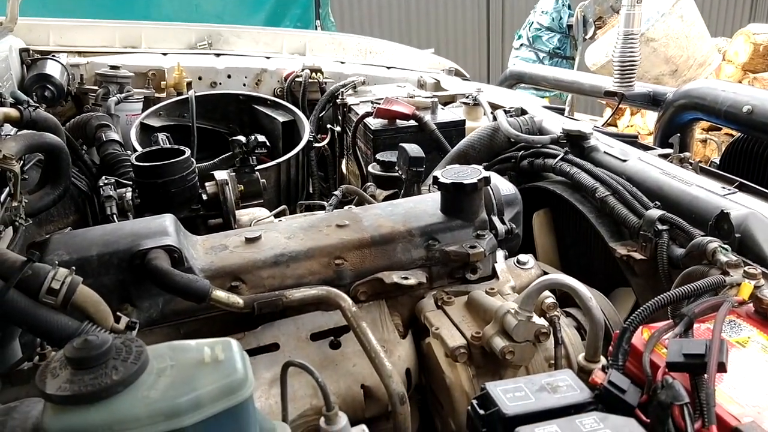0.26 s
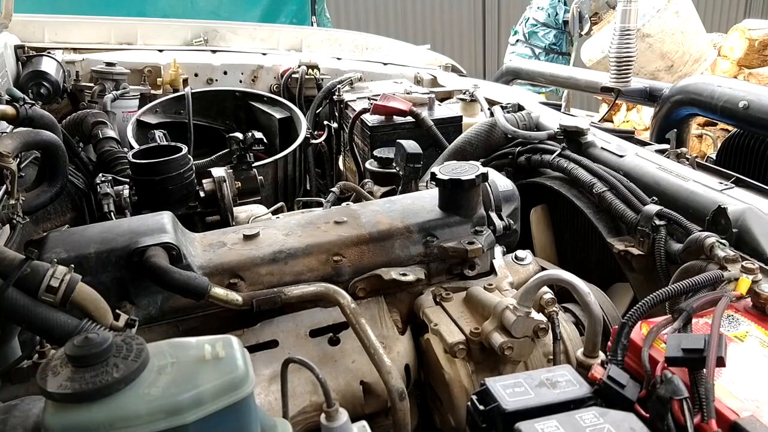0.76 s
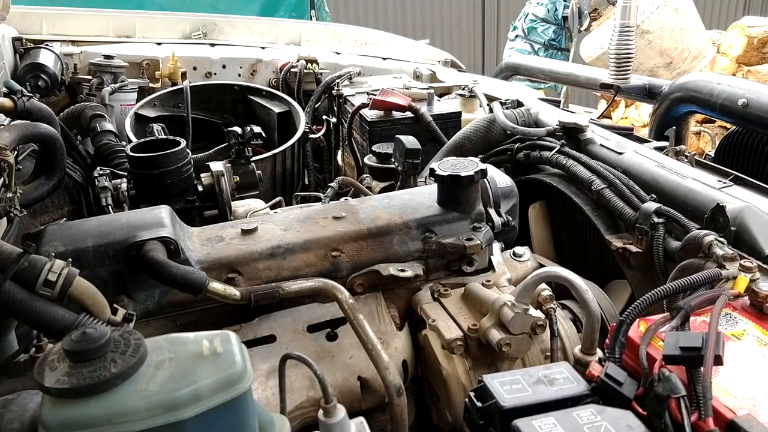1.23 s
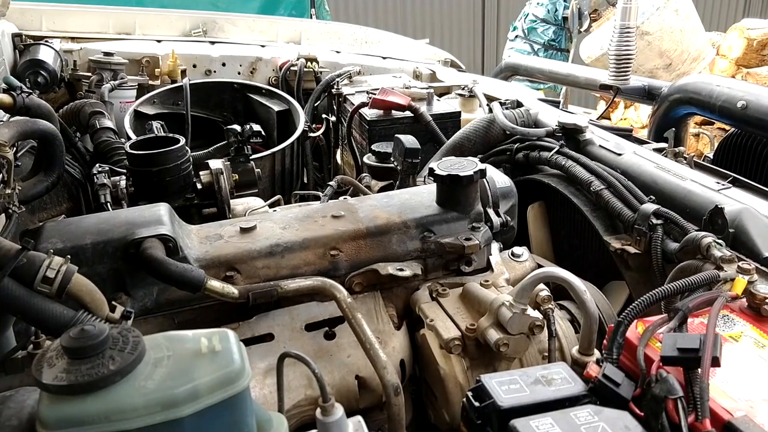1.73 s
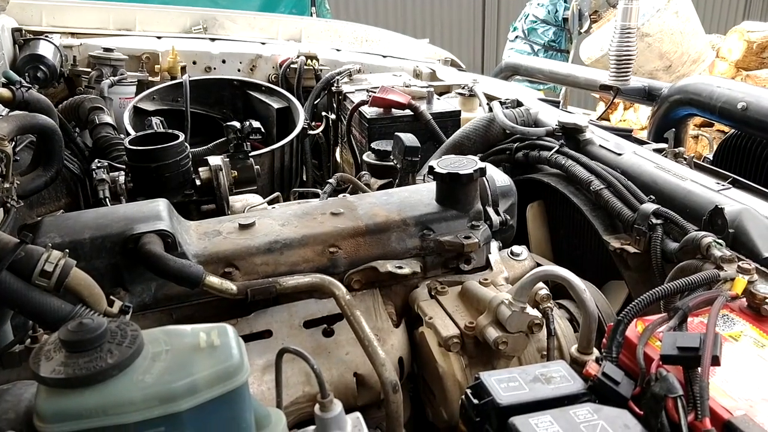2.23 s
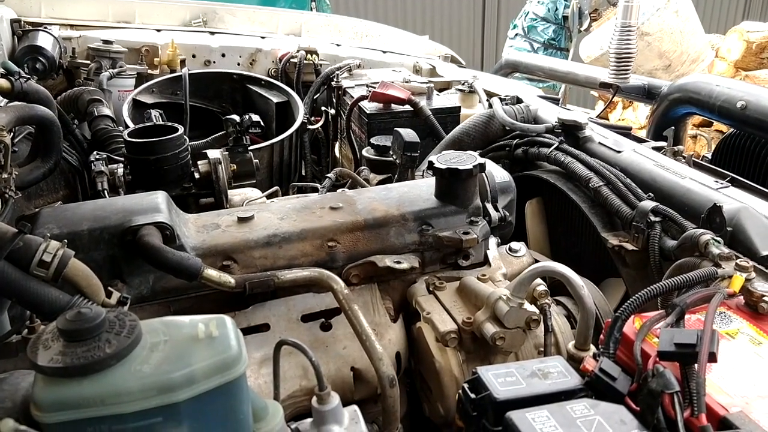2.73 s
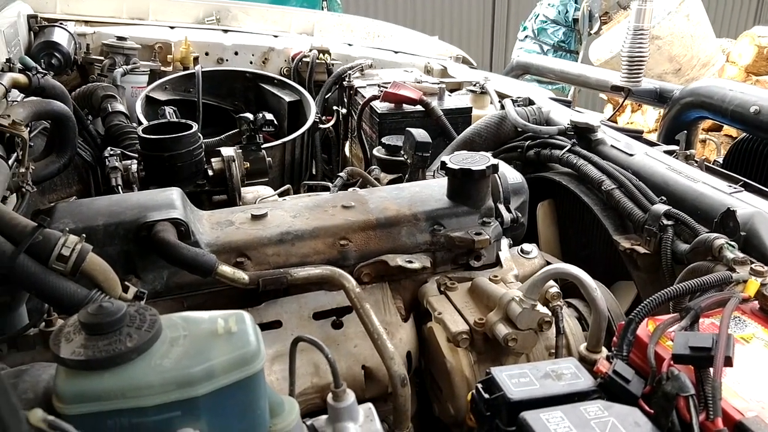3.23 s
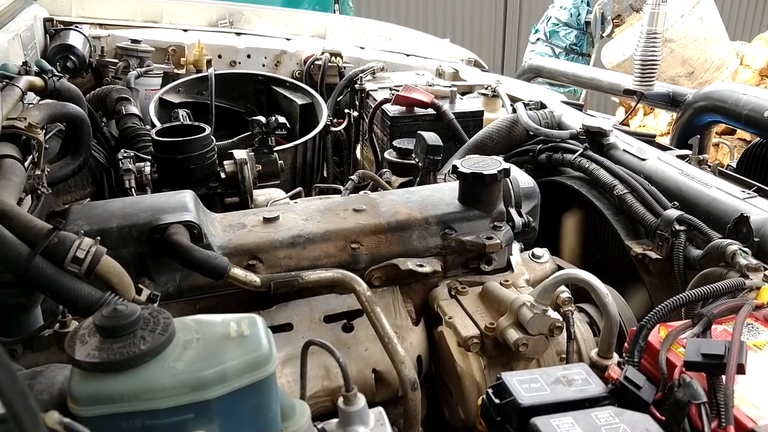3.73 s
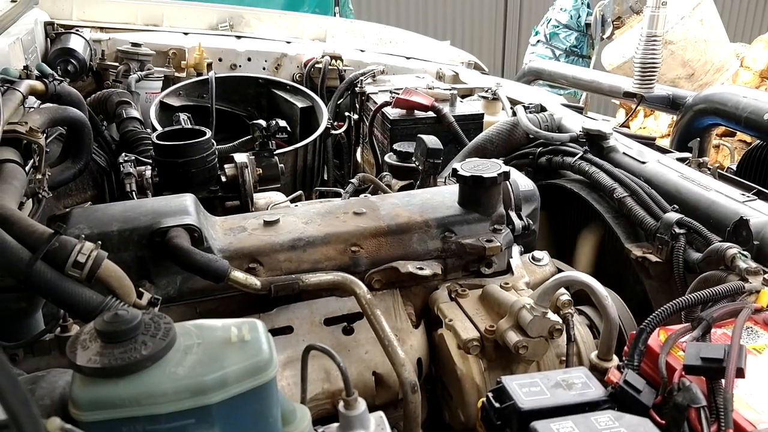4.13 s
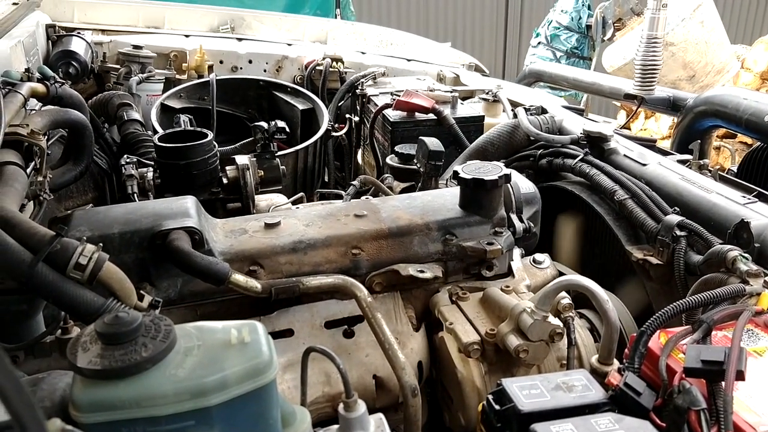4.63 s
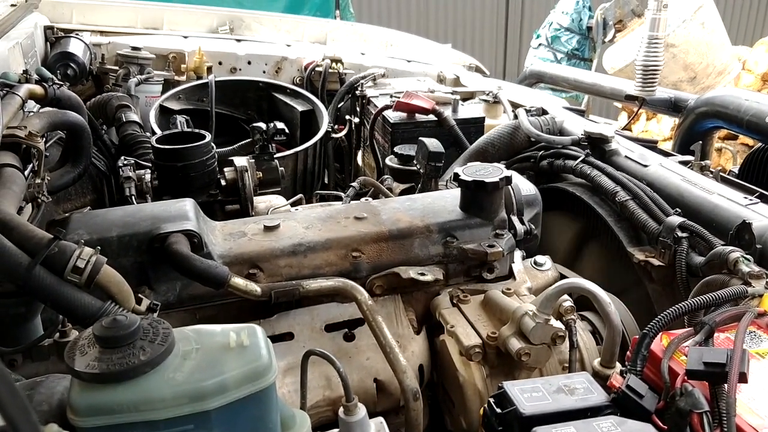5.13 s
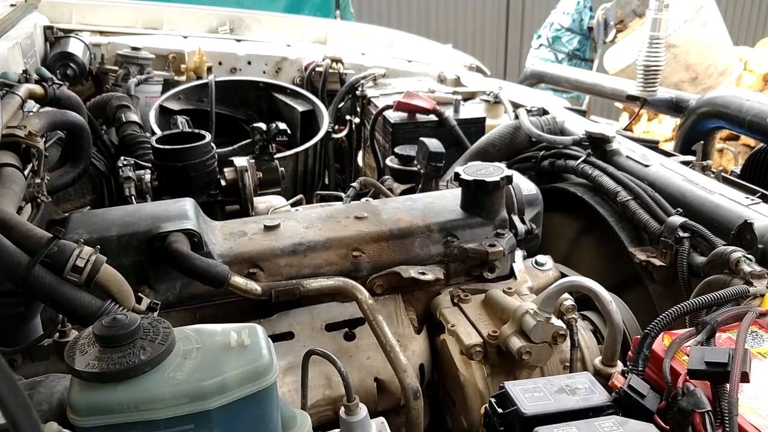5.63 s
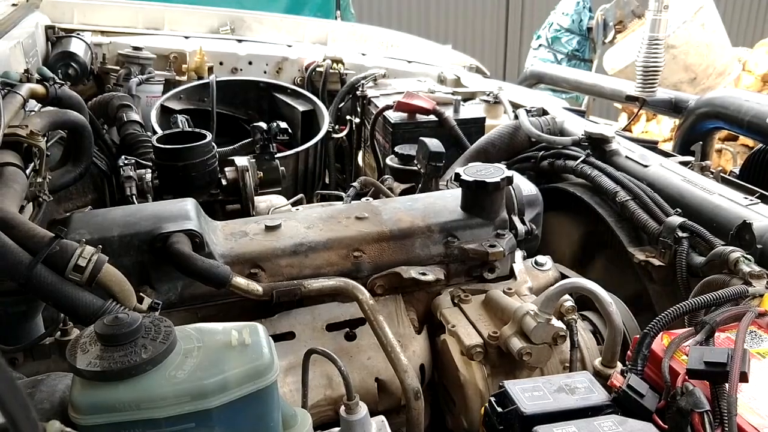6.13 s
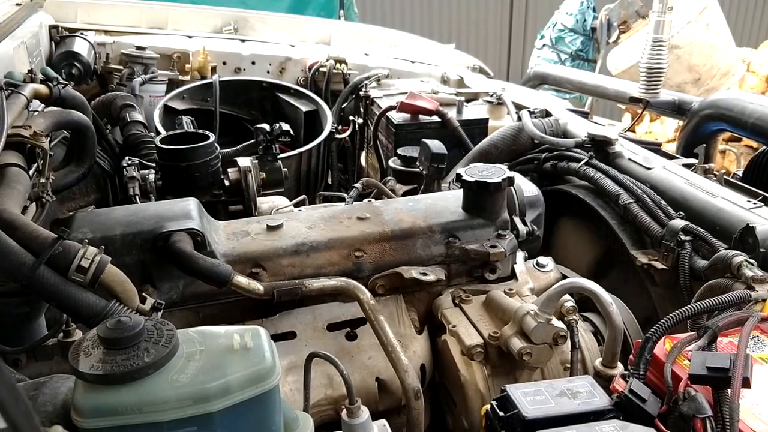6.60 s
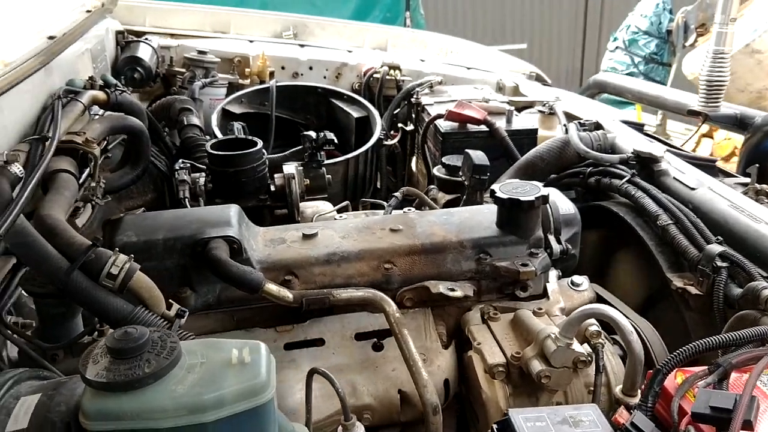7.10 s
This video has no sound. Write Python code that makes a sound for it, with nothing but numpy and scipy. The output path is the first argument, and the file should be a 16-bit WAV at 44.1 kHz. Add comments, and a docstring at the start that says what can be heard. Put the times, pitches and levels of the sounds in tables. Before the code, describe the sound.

Close to a diesel engine under an open bonnet, a few faint relay clicks and a brief pump buzz sound over a distant rumble. A low whirr rises quietly, with more sparse clicks. Halfway through, the starter engages with a metallic clack and cranks in grinding pulses for about a second. The engine catches and idles unevenly, thumping and knocking over the hiss of its fan.

```python
"""A four-cylinder diesel cranks, catches and idles with a hunting governor under an open bonnet.
Each firing thumps the intake, drums the block, knocks and ticks an injector; fan and belts hiss
and the timing gears whine. Before that, over a distant rumble and a low whirr, relays click, a small
pump buzzes and the starter's gears groan and grind against each compression.
Two microphone ports hear it from close by, with treble scattered by bonnet and walls."""
import sys
import numpy as np
from scipy import signal
from scipy.fft import rfft, irfft, next_fast_len
from scipy.io import wavfile
from scipy.ndimage import uniform_filter1d

SR = 44100
rng = np.random.default_rng(int(sys.argv[2]) if len(sys.argv) > 2 else 0)


def wav_out(sig):
    """Save sig, one row per channel (or a flat mono array), as 16-bit PCM at SR to the path in sys.argv[1]."""
    wavfile.write(sys.argv[1], SR, np.round(np.clip(np.atleast_2d(sig).T, -1, 1) * 32767).astype(np.int16))


N = 324576
TIME = np.arange(N) / SR
N_FFT = next_fast_len(N + 4096)
BIN_HZ = np.fft.rfftfreq(N_FFT, 1 / SR)


def gain(db):
    return 10 ** (np.asarray(db) / 20)


def unit_rms(x):
    return x / np.sqrt(np.mean(x ** 2) + 1e-20)


def noise():
    return rng.standard_normal(N)


def at_hz(points, hz):
    f, value = np.transpose(points)
    return np.interp(np.log(hz + 1), np.log(f + 1), value)


def envelope(points):
    return gain(np.interp(TIME, *np.transpose(points)))


def colour(x, points):
    """Zero-phase filter through (Hz, dB) points."""
    return irfft(rfft(x, N_FFT) * gain(at_hz(points, BIN_HZ)))[:N]


def ring(x, modes):
    """Parallel resonances, each (Hz, width in Hz, peak gain in dB)."""
    return sum(gain(db) * signal.lfilter(*signal.iirpeak(hz, hz / width, SR), x)
               for hz, width, db in modes)


def strikes(times_s, size):
    train = np.zeros(N + SR)
    np.add.at(train, np.round(np.asarray(times_s) * SR).astype(int), size)
    return train[:N]


def bursts(train, t60_s, rise_s=0.0018):
    """Decaying noise at each strike."""
    t = np.arange(SR // 4) / SR
    shape = gain(-60 * t / t60_s) * (1 - np.exp(-t / rise_s))
    return signal.oaconvolve(train, shape)[:N] * noise()


def swells(rows, rise_db_per_s, fall_db_per_s, rest_db):
    """Level in dB: each row rises to its start, drifts to its end and falls to rest."""
    level_db = np.full(N, float(rest_db))
    for s, length, start_db, end_db, *_ in rows:
        corners_s = [s - 1, s, s + length, s + length + 1]
        corners_db = [start_db - rise_db_per_s, start_db, end_db, end_db - fall_db_per_s]
        level_db = np.maximum(level_db, np.interp(TIME, corners_s, corners_db))
    return level_db


# Each row: frequency in Hz, gain in dB.
RUMBLE_SPECTRUM = [(70, -2.5), (130, 0.5), (250, -14), (450, -15), (750, -17), (1200, -27.5), (2000, -33),
                   (4500, -41), (13000, -47)]
# Each row: time in seconds, relative level in dB.
RUMBLE_LEVELS = [(0, -49), (2.9, -47), (3.7, -46)]
WHIRR_LEVELS = [(.95, -59.5), (1.2, -46.5), (3.7, -44)]


def background():
    """Lumpy distant rumble and a low whirr that swells."""
    lumps = gain(unit_rms(uniform_filter1d(noise(), 2500)))
    rumble = unit_rms(colour(noise(), RUMBLE_SPECTRUM))
    whirr = unit_rms(colour(noise(), [(170, 0), (320, 4.5), (390, -12.5), (800, -66)]))
    return envelope(RUMBLE_LEVELS) * lumps * rumble + envelope(WHIRR_LEVELS) * whirr


# Each row: start in seconds, relative level in dB, relative thud gain in dB, T60 in seconds.
RELAY_CLICKS = [(0.114, -40.5, 6, 0.13), (0.488, -23.5, -8, 0.083), (0.507, -36.5, 9.5, 0.13),
                (0.554, -31.5, -2, 0.11), (0.567, -31, -20, 0.07), (0.796, -23, -8, 0.029),
                (1.478, -19, -28, 0.036), (1.808, -22, -40, 0.026), (2.407, -19.5, -39, 0.038),
                (3.701, -23, -1, 0.044), (3.7225, -15.5, -3, 0.055)]
# Each row: frequency in Hz, width in Hz, gain in dB.
CASE_MODES = [(1135, 32, -2.5), (1193, 20, -8), (2115, 68, -8)]
# Each row: frequency in Hz, gain in dB.
SNAP_SPECTRUM = [(300, -27), (2000, -40), (4500, -7.5), (9300, -3), (11500, -5), (13500, 2)]


def relays():
    """Relays, latches and the starter solenoid snap, ring their cases and thud."""
    sound = np.zeros(N)
    for s, db, thud_db, t60_s in RELAY_CLICKS:
        snap = bursts(strikes([s], gain(db)), t60_s, rise_s=0.0011)
        case = ring(gain(12) * snap + strikes([s + 0.001144], gain(db + 31)), CASE_MODES)
        thud = gain(thud_db + 15) * ring(snap, [(240, 206, 0)])
        sound += 0.52 * colour(snap, SNAP_SPECTRUM) + case + thud
    return sound


# Each row: start in seconds, relative level in dB.
SOFT_BUMPS = [(0.232, -28.5), (0.295, -29.5)]


def bumps(hz=116, decay_s=0.0035):
    """Soft low bumps, each a heavily damped sine."""
    sound = np.zeros(N)
    for s, db in SOFT_BUMPS:
        age_s = np.maximum(TIME - s, 0)
        sound += 625 * gain(db) * age_s * np.exp(-age_s / decay_s) * np.sin(2 * np.pi * hz * age_s)
    return sound


# Each row: time in seconds, relative level in dB.
PUMP_LEVELS = [(.57, -25), (.61, -45), (.785, -46), (.797, -27.5), (.815, -43.5), (1.03, -40), (1.05, -56)]
# Each row: frequency in Hz, gain in dB.
BUZZ_SPECTRUM = [(250, -42), (750, 0.5), (1300, -8.5), (3500, -7), (8000, -19.5), (13000, -19)]
# Each row: frequency in Hz, width in Hz, gain in dB.
SHELL_MODES = [(498, 59, 3), (742, 204, 2), (1924, 61, -1.5)]


def pump(stroke_hz=63.5, loaded_s=0.8228):
    """A small pump rasps, then takes load and its strokes rattle the shell."""
    count = np.ceil(stroke_hz * np.maximum(TIME - loaded_s, 0))
    strokes = np.diff(count, prepend=0) * gain(0.51 * noise())
    rattle = 10 * strokes + bursts(strokes, t60_s=0.045, rise_s=0.0008)
    rasp = noise()
    shell = unit_rms(ring(ring(rattle + 0.36 * rasp, SHELL_MODES), SHELL_MODES))
    buzz = unit_rms(colour(rattle + 0.3 * rasp, BUZZ_SPECTRUM))
    on = (TIME > PUMP_LEVELS[0][0]) & (TIME < PUMP_LEVELS[-1][0])
    return on * envelope(PUMP_LEVELS) * (shell + 0.75 * buzz)


ENGAGE_S, RELEASE_S = 3.722, 4.87
# Metal impact, also the combustion knock. Each row: frequency in Hz, gain in dB.
IMPACT_SPECTRUM = [(500, -43), (1200, -4), (2400, -1.5), (4500, -15.5), (9300, -16.5), (14000, -17.5)]


def pinion_clack():
    """The starter pinion hits the ring gear."""
    hit = strikes([ENGAGE_S + 0.00068], gain(-11.5))
    return colour(bursts(hit, t60_s=0.085, rise_s=0.0003), IMPACT_SPECTRUM)


# Each row: start and length in seconds, load at start and end in dB, full-speed tooth rate in Hz.
CRANK_STROKES = [(3.746, 0.23, -29, -26.5, 339.1), (4.028, 0.097, -25, -25, 417),
                 (4.191, 0.073, -24.5, -24, 443), (4.339, 0.071, -24.5, -26, 442.6),
                 (4.469, .085, -29.5, -27, 430.3), (4.712, 0.045, -20.5, -41, 533.7),
                 (4.805, 0.05, -25.5, -34, 524.4)]


def cranking(spin_up_s=0.13, sag_share=0.38, sag_lead_s=0.06, sag_s=0.09):
    """Starter load and tooth rate: each stroke leaps to speed, then sags into the compression."""
    load_db = swells(CRANK_STROKES, rise_db_per_s=1400, fall_db_per_s=350, rest_db=-43)
    load_db -= 200 * np.maximum(TIME - RELEASE_S, 0)
    start_s, length_s, _, _, top_hz = np.transpose(CRANK_STROKES)
    stroke = np.clip(np.searchsorted(start_s - 0.015, TIME) - 1, 0, None)
    compression = np.clip((TIME - (start_s + length_s)[stroke] + sag_lead_s) / sag_s, 0, 1)
    sag = sag_share * np.sin(np.pi / 2 * compression) ** 2
    spin = 0.45 + 0.55 * np.sin(np.pi / 2 * np.clip((TIME - ENGAGE_S) / spin_up_s, 0, 1)) ** 2
    return load_db, uniform_filter1d(top_hz[stroke] * spin * (1 - sag), 1100)


# Each row: frequency in Hz, gain in dB.
BELLHOUSING_RESPONSE = [(180, -21), (240, 2), (430, -6.5), (530, -2.5), (800, 2.5), (1300, -8),
                        (1750, -4.5), (2400, -20), (3600, -15), (4600, -24.5)]
GRIND_SPECTRUM = [(75, -26), (110, -12), (160, -29), (250, -14), (1200, -12.5), (3600, -23.5), (6000, -24),
                  (13500, -30)]
# Each row: frequency in Hz, width in Hz, gain in dB.
HOUSING_MODES = [(757, 177, 21), (1029, 74, 18)]


def starter():
    """Meshing teeth groan in harmonics; their puffs of grinding noise ring the housing."""
    load_db, tooth_hz = cranking()
    teeth = np.cumsum(tooth_hz * (1 + 0.55 * uniform_filter1d(noise(), 500))) / SR
    order = np.arange(1, 14)[:, None]
    flutter = 1 + 9.5 * uniform_filter1d(rng.standard_normal((N, 13)).T, 250)  # uneven teeth
    order_db = at_hz(BELLHOUSING_RESPONSE, order * tooth_hz)
    order_db += 11.33 * (order == 1) + 6.7 * (order % 4 == 0)
    tones = np.sin(2 * np.pi * (order * teeth + rng.random((13, 1))))
    groan = gain(0.093 * (load_db + 27)) * (gain(order_db) * flutter * tones).sum(0)
    puffs = (0.5 + np.exp(-(teeth % 1) / 0.51)) * noise()
    housing = unit_rms(ring(ring(puffs, HOUSING_MODES), HOUSING_MODES))
    grind = unit_rms(colour(puffs, GRIND_SPECTRUM)) * gain(0.4 * load_db - 21.7)
    on = (TIME > ENGAGE_S) & (TIME < RELEASE_S + 0.08)
    return on * (gain(load_db) * (0.98 * housing + 0.67 * groan) + grind)


# Each row: frequency in Hz, gain in dB.
FAN_SPECTRUM = [(40, 2), (250, 2.5), (750, -2), (1200, -13.5), (2000, -18.5), (4500, -29), (15000, -28.5)]


def fan_hiss(fire_s, fuel_db):
    """Fan, belts and air: the hiss follows the fuel, leaps at each firing and sinks."""
    level_db = 0.83 * (uniform_filter1d(np.maximum(fuel_db, -17), 2000) + 15.5) - 30
    since_s = TIME - fire_s[np.clip(np.searchsorted(fire_s, TIME) - 1, 0, None)]
    pulse_db = 3 - 170 * np.clip(since_s, 0, 0.05)
    return unit_rms(colour(noise(), FAN_SPECTRUM)) * gain(level_db + pulse_db)


def gear_whine(fire_s, fuel_db, cycles_per_firing=47.5, width_hz=40):
    """Timing gears: a narrow noise band that tracks the firing rate."""
    fired = uniform_filter1d(np.interp(TIME, fire_s, np.arange(len(fire_s))), 7000)
    fuzz = unit_rms(signal.lfilter([1], [1, -np.exp(-np.pi * width_hz / SR)], noise()))
    return gain(0.68 * fuel_db - 32.86) * fuzz * np.sin(2 * np.pi * cycles_per_firing * fired)


# Each row: base frequency in Hz, width in Hz, gain in dB.
INTAKE_MODES = [(106, 17.4, 1), (118.3, 17.7, 5)]
# Each entry: frequency ratio of one cylinder's intake pipe.
PIPE_TUNING = [1.054, 0.964, 1.104, 0.975]


def intake_thump(fire_s, level_db):
    """The cylinders gulp in turn, each ringing its own pipe."""
    cylinder = np.arange(len(fire_s)) % len(PIPE_TUNING)
    pipes = np.zeros(N)
    for k, ratio in enumerate(PIPE_TUNING):
        gulps = strikes(fire_s + 0.00192, gain(level_db) * (cylinder == k))
        pipes += ring(gulps, np.multiply(INTAKE_MODES, [ratio, 1, 1]))
    return gain(49) * ring(pipes, [(130, 94, 0.5), (227, 124, -8.5)])


# Each row: frequency in Hz, width in Hz, gain in dB.
BLOCK_MODES = [(220, 13, 8.5), (368, 16.3, 12.5), (562, 30.1, 1.5), (665.5, 29.3, 6.5), (760, 17, -17)]


def block_drum(fire_s, level_db):
    """Each firing strikes the block's modes."""
    blows = strikes(fire_s, gain(level_db))
    block = ring(gain(25.5) * blows + 0.8 * bursts(blows, t60_s=0.08), BLOCK_MODES)
    return gain(16) * ring(block, [(600, 450, 0)])


# Each row: frequency in Hz, width in Hz, gain in dB.
HEAD_MODES = [(1613, 39, -4), (1870, 81, -4), (1967, 52, 6), (3365, 20, -10)]


def knock(fire_s, level_db):
    """Combustion raps sharply and rings the cylinder head."""
    hits = strikes(fire_s + 0.000975, gain(level_db))
    rap = bursts(hits, t60_s=0.084, rise_s=0.000089)
    return gain(5) * (colour(rap, IMPACT_SPECTRUM) + ring(rap + 22 * hits, HEAD_MODES))


def injector_tick(fire_s, level_db):
    """One bright injector tick per firing."""
    return ring(bursts(strikes(fire_s, gain(level_db)), t60_s=0.036), [(8940, 1670, -0.34)])


# Each row: time in seconds, relative knock and drum levels in dB, thump offset in dB.
HARD_FIRINGS = [(4.9195, -32.5, -33, 0), (4.9886, -24, -34, 3.5), (5.036, -26.5, -25.5, -1),
                (5.083, -24, -23, -1), (5.1223, -26, -19, -3.5), (5.1567, -16.5, -20, -3.5),
                (5.223, -23.5, -32, -2), (5.2536, -21.5, -27, 2), (5.2832, -50, -19, 2),
                (5.3667, -26, -24, 4), (5.3958, -36, -19.5, 1.5), (5.427, -28.5, -28, -2),
                (5.457, -34, -26, 4), (5.487, -29, -32, 2.5), (5.5162, -49, -21, 3.5),
                (5.619, -33, -35, -1), (5.6545, -22.5, -18.5, 1), (5.7158, -20, -17.5, 0.5),
                (5.747, -43, -22.5, 1.5), (5.834, -44, -25, -2), (5.905, -25.5, -26, -3),
                (5.9352, -29, -26.5, 0), (5.968, -21.5, -25, 0), (5.998, -33, -24, 1.5),
                (6.0265, -24, -18.5, 1), (6.2556, -21, -25.5, -1), (6.29, -22, -18.5, -2),
                (6.32, -23, -21.5, 0.5), (6.3775, -21, -27.5, -0.5), (6.498, -26, -31, -0.5),
                (6.6725, -23.5, -17.5, 0.5), (6.7988, -46, -21, -1), (6.8626, -28, -26, -0.5),
                (6.922, -23.5, -19.5, -1), (7.0428, -32, -19.5, 0), (7.1081, -23, -26.5, -1),
                (7.1721, -34, -19.5, -0.5), (7.3193, -24, -26.5, -5.5)]


def firings(fuel_db, flywheel_s=0.05, base_hz=24, pull_hz=43, run_up_end_s=5.2):
    """Fuel speeds the lagging flywheel. Returns all firing times and the indices of the hard ones."""
    pole = np.exp(-1 / (flywheel_s * SR))
    firing_hz = base_hz + pull_hz * signal.lfilter([1 - pole], [1, -pole], gain(fuel_db))
    firing_hz -= 30 * np.clip(run_up_end_s - TIME, 0, 0.5)
    cycles = np.cumsum(firing_hz) / SR
    # Warp the count so each hard firing lands on a whole number.
    marks = np.interp([row[0] for row in HARD_FIRINGS], TIME, cycles)
    hard = np.cumsum(np.round(np.diff(marks, prepend=marks[0]))).astype(int)
    count = np.interp(cycles, [*marks, marks[-1] + 10], [*hard, hard[-1] + 10])
    count += np.minimum(cycles - marks[0], 0)
    return np.interp(np.arange(int(count[-1]) + 1), count, TIME), hard


# Each row: start and length in seconds, relative fuel level at start and end in dB.
GOVERNOR_SURGES = [(5.12, 0.15, -13.5, -14), (5.362, 0.089, -15.5, -13.5), (5.51, 0.014, -14, -12.5),
                   (5.653, 0.1, -10.5, -11.5), (5.835, 0.013, -10, -19.5), (5.936, 0.11, -11.5, -12.5),
                   (6.085, 0.06, -19, -16.5), (6.256, 0.27, -11, -14.5), (6.635, 0.065, -15.5, -12.5),
                   (6.767, 0.04, -10, -14.5), (6.861, 0.18, -10, -15), (7.105, 0.29, -12.5, -15)]


def engine(catch_s=4.92):
    """The engine catches and the governor hunts; fuel surges set firing rate and strength."""
    surge_db = swells(GOVERNOR_SURGES, rise_db_per_s=333, fall_db_per_s=238, rest_db=-23)
    fuel_db = np.minimum(surge_db, -34 + 104 * (TIME - catch_s))
    fire_s, hard = firings(fuel_db)
    charge_db = np.interp(fire_s, TIME, fuel_db)
    scatter = rng.standard_normal((100, 5))[:len(fire_s)].T
    gulp_db = 1.5 * scatter[0]
    drum_db = 0.7 * charge_db - 18.5 + 1.8 * scatter[1]
    knock_db = 0.5 * charge_db - 26.5 + 2.2 * scatter[2]
    _, knock_db[hard], drum_db[hard], gulp_db[hard] = np.transpose(HARD_FIRINGS)
    sound = intake_thump(fire_s, charge_db + gulp_db) + block_drum(fire_s, drum_db)
    sound += knock(fire_s, knock_db) + injector_tick(fire_s, -26 + 3.9 * scatter[4])
    running = np.clip((TIME - 4.85) / 0.13, 0, 1)
    return sound + running * (fan_hiss(fire_s, fuel_db) + gear_whine(fire_s, fuel_db))


# Each row: frequency in Hz, left minus right in dB.
PORT_BALANCE = [(60, 3.5), (130, 7), (270, 2.5), (450, -1.5), (800, 3), (2500, -2), (9000, 5.5),
                (12200, -0.5), (14000, -6.5)]
# Each row: frequency in Hz, extra phase lead on the right in radians.
PORT_PHASE = [(40, 3), (130, 1.29), (300, 0.4057), (600, -0.88), (1200, -3), (2500, -3)]


def ports(x, right_lead_s=18 / SR):
    """Two microphone ports: the right is earlier and phase-shifted, the left favours the bass."""
    half_balance = gain(at_hz(PORT_BALANCE, BIN_HZ) / 2)
    lead = np.exp(1j * (2 * np.pi * BIN_HZ * right_lead_s + at_hz(PORT_PHASE, BIN_HZ)))
    return irfft(rfft(x, N_FFT) * np.array([half_balance, lead / half_balance]))[:, :N]


def bay_scatter(x):
    """Bonnet and walls scatter treble, with random phase and gain at each port."""
    hz, frames, spectrum = signal.stft(x, SR, nperseg=256)
    draws = rng.standard_normal((len(frames), len(hz), 4)).T
    treble_tilt = ((hz + 250) / (hz + 3000))[:, None]
    scattered = spectrum * (draws[::2] + 1j * draws[1::2]) * treble_tilt
    return np.roll(signal.istft(scattered, SR, nperseg=256)[1], 128, axis=1)[:, :N]


def scene():
    sound = starter() + pinion_clack() + engine() + relays() + bumps() + pump() + background()
    return ports(sound) + bay_scatter(sound)


def record(dry):
    """Microphone droop in deep bass and top treble, then a low-pass."""
    response_hz_db = [(25, -17.5), (70, -2), (13800, -2), (15500, -16)]
    drooped = np.array([colour(x, response_hz_db) for x in dry])
    lowpass = signal.firwin(511, 15500, window=("kaiser", 9), fs=SR)
    return signal.oaconvolve(drooped, lowpass[None], "same")


dry = scene()
out = record(dry)
wav_out(out)
```